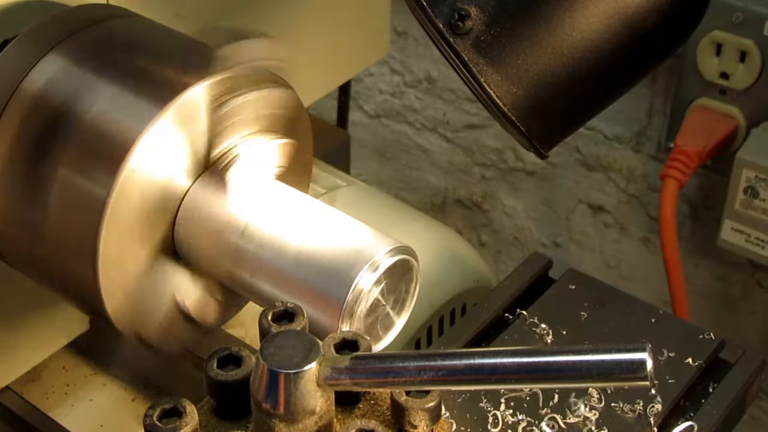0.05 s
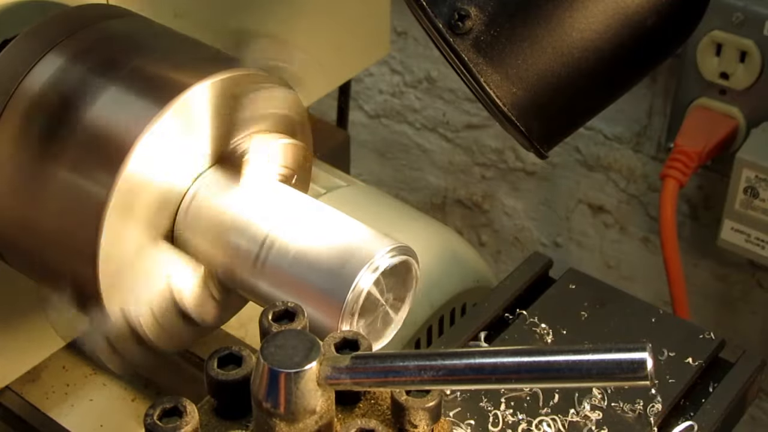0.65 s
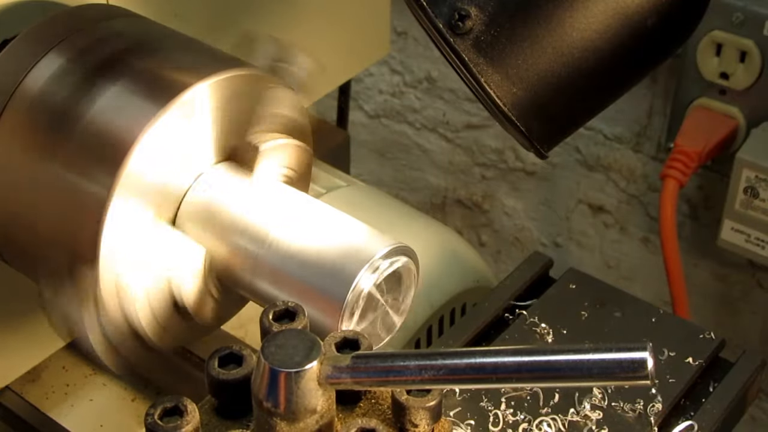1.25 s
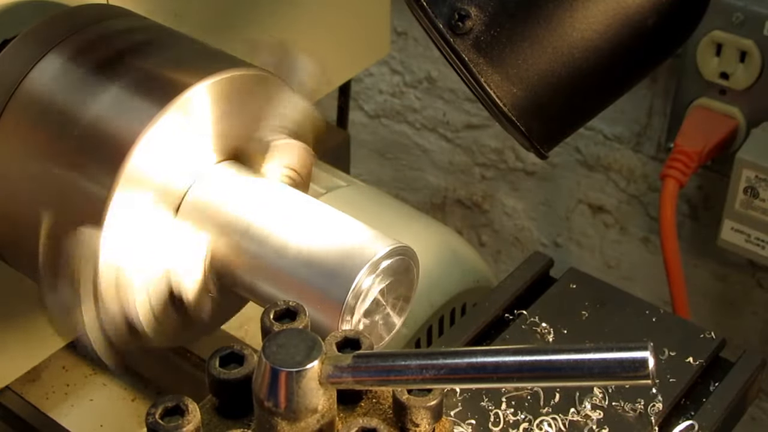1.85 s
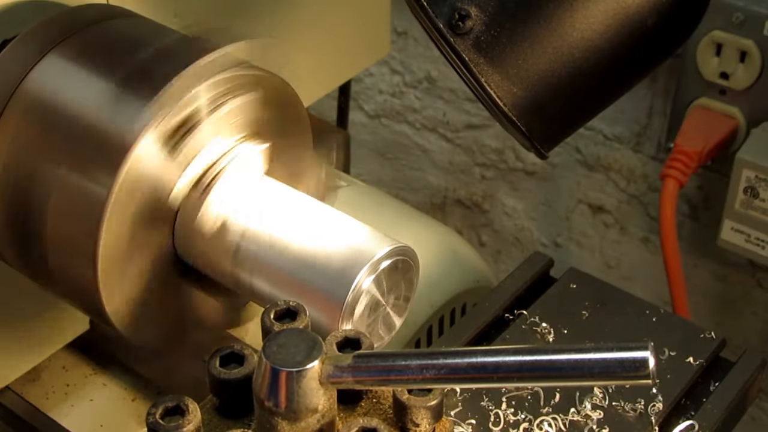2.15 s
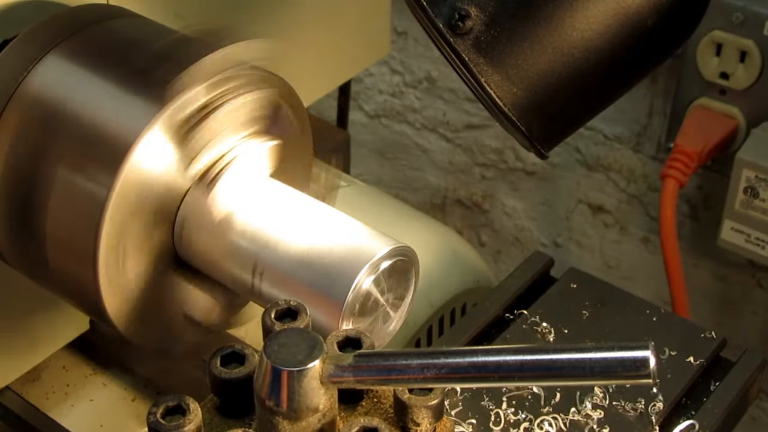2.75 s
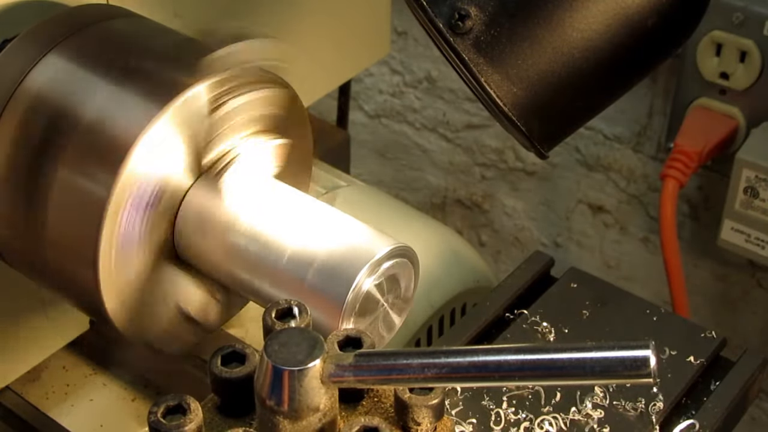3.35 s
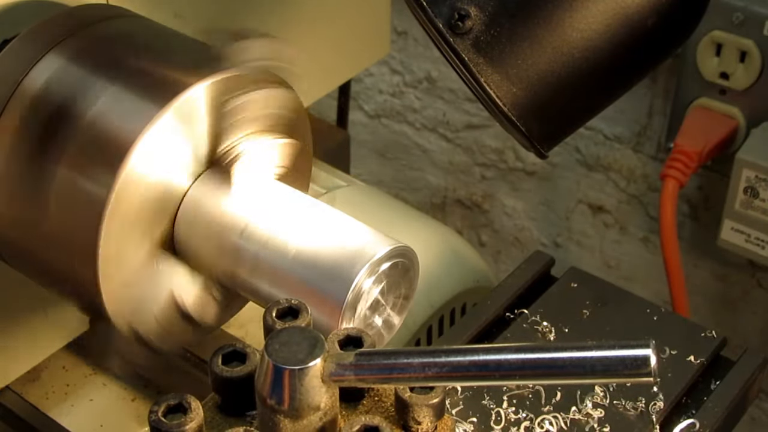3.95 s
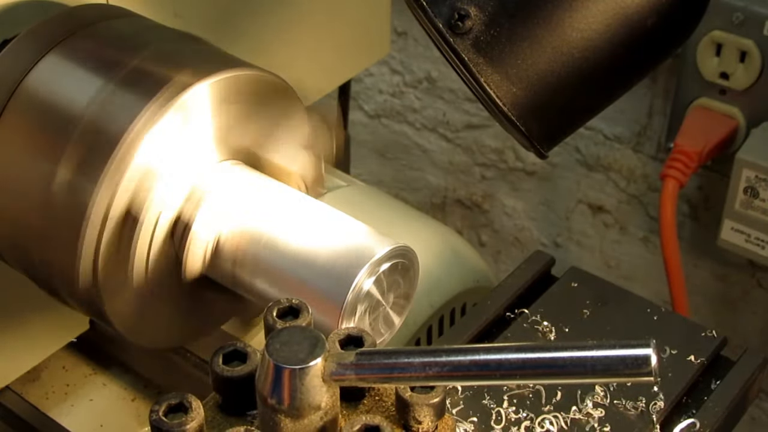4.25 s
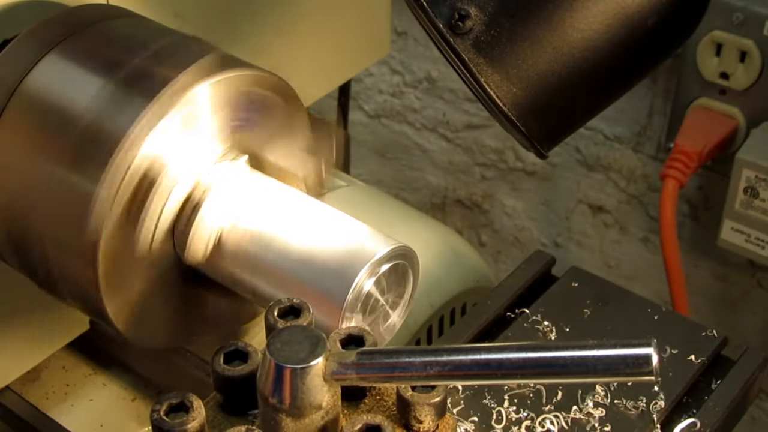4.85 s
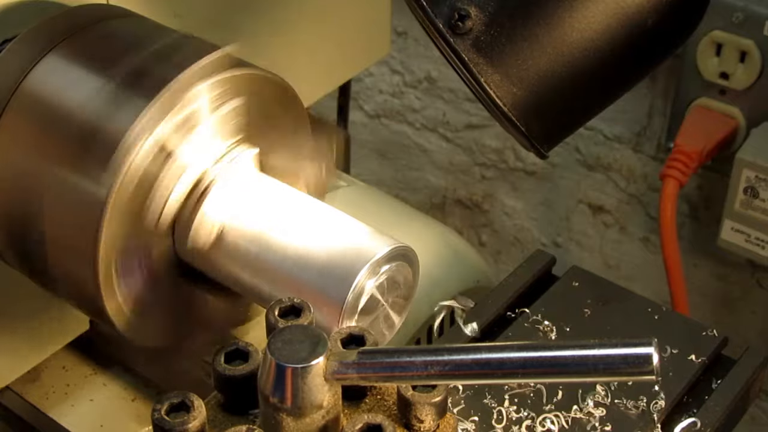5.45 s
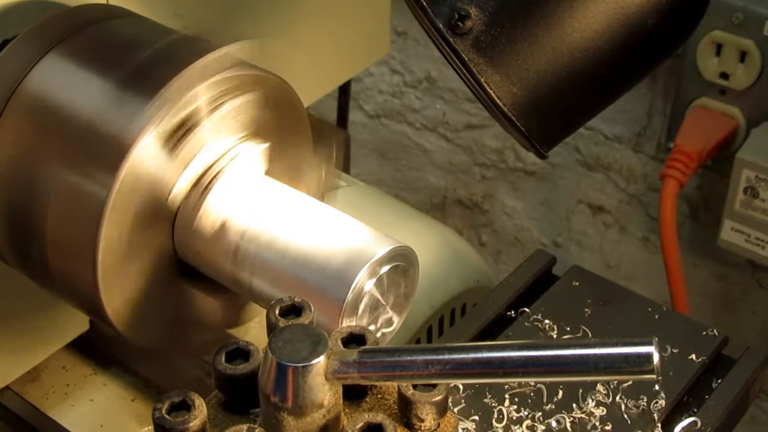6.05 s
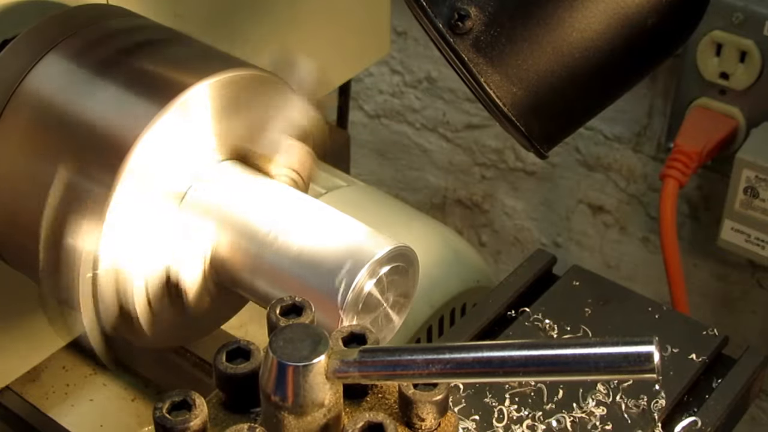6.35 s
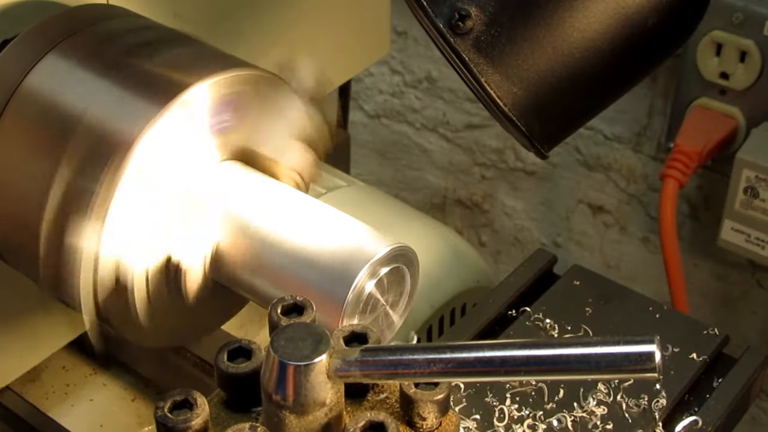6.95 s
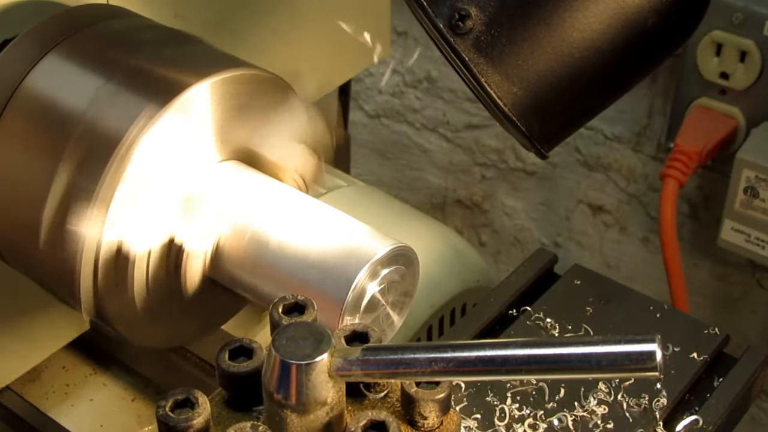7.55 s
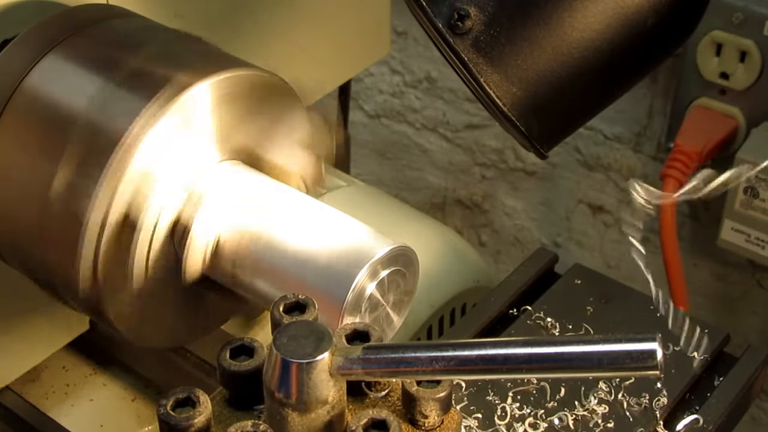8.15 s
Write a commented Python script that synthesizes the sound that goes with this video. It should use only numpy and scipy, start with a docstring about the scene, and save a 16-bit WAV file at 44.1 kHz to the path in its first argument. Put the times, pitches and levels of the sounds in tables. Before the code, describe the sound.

High-pitched ringing and brief squeals from a tool cutting metal on a small lathe, easing off as the motor's steady whirr swells.

```python
"""Small lathe cutting aluminium.

A mono microphone stands close to a small metal lathe in a workshop. The chip rubs over the tool, which
rings near 4.4 kHz, surges a few times a second and breaks into short squeals that stutter when the push
is hard, over the hum and whirr of the drive. Each loud squeal pushes the recorder's limiter down; as the
cut lightens, the limiter lets the machine swell up."""
import sys
import numpy as np
from scipy import signal
from scipy.fft import rfft, irfft
from scipy.io import wavfile
from scipy.ndimage import uniform_filter1d

SR = 44100
rng = np.random.default_rng(int(sys.argv[2]) if len(sys.argv) > 2 else 0)


def log_audio(samples):
    """Write samples as a 16-bit WAV file to the path given in sys.argv[1]."""
    # one column per channel
    frames = np.atleast_2d(samples).T
    # limit to full scale, then quantise
    limited = np.clip(frames, -1, 1)
    pcm = np.round(limited * 32767).astype(np.int16)
    wavfile.write(sys.argv[1], SR, pcm)


N = 361179
TIME = np.arange(N) / SR
FREQS = np.fft.rfftfreq(N, 1 / SR)
SPINDLE_HZ, BELT_HZ = 10.49, 6.7  # turns a second

# The tool's short squeals. Each row: start and length in seconds, level in dB, pitch in Hz, slip count.
SHORT_SQUEALS = [(0.007, 0.017, 4, 4170, 2), (0.053, 0.0072, 3, 4280, 1), (0.07, 0.029, 5.5, 4140, 3),
                 (0.137, 0.018, 4, 4377, 1), (0.237, 0.025, 1.5, 4310, 3), (0.545, 0.035, 4, 4206, 4),
                 (0.692, 0.006, 0.5, 4240, 1), (0.717, 0.029, 4, 4325, 3), (0.804, 0.021, -0.5, 4360, 1),
                 (1.093, 0.01, 1.5, 4377, 1), (1.154, 0.01, 2.5, 4176, 1), (1.182, 0.024, 4.5, 4410, 1),
                 (1.28, 0.02, -4, 4420, 1), (1.371, 0.016, -4.5, 4450, 1), (1.565, 0.012, 4.5, 4300, 1),
                 (1.582, 0.023, 3, 4200, 1), (1.788, 0.017, 0.8, 4420, 1), (1.952, 0.016, -2, 4430, 1),
                 (2.043, 0.03, 0, 4430, 1), (2.251, 0.042, -3.5, 4290, 4), (2.398, 0.017, 2, 4280, 2),
                 (2.424, 0.012, -0.5, 4405, 1), (2.464, 0.006, -3, 4070, 1), (2.471, 0.0195, 6, 4185, 1),
                 (2.518, 0.014, -3, 4414, 1), (2.824, 0.03, -1.5, 4280, 4), (2.88, 0.009, 1, 4387, 1),
                 (3.022, 0.057, 8, 4240, 4), (3.076, 0.063, 2.5, 4400, 4), (3.831, 0.013, 4, 4392, 1),
                 (4.134, 0.026, 0, 4390, 1), (4.363, 0.01798, 7, 4406, 1), (4.382, 0.019, 0, 4420, 1),
                 (4.711, 0.021, -3.5, 4490, 1), (4.804, 0.081, -5, 4410, 3), (4.994, 0.09, -4.5, 4410, 3),
                 (5.154, 0.021, -2.5, 4424, 1), (5.249, 0.021, 1.5, 4370, 1), (5.35, 0.013, 1.5, 4404, 1),
                 (5.412, 0.016, -1.4, 4450, 1), (5.446, 0.017, 0.95, 4410, 1),
                 (5.466, 0.027, -3.5, 4410, 1), (6.269, 0.01, -6.5, 4360, 1), (6.419, 0.021, -7.5, 4480, 1),
                 (6.553, 0.009, -0.5, 4402, 1)]


def amp(db):
    """Decibels to gain."""
    return 10 ** (np.asarray(db) / 20)


def unit(x):
    """Scales to rms 1."""
    return x / np.sqrt(np.mean(abs(x) ** 2) + 1e-20)


def curve(rows, column=1):
    """One column of a table, joined by straight lines in time."""
    rows = np.asarray(rows)
    return np.interp(TIME, rows[:, 0], rows[:, column])


def spectrum(points):
    """Levels in dB at every frequency, joined on a log axis."""
    hz, db = np.transpose(points)
    return np.interp(np.log(FREQS + 1), np.log(hz), db)


def colour(x, db):
    """Filters x by a dB spectrum; rms 1."""
    return unit(irfft(rfft(x) * amp(db), N))


def drift(rate_hz):
    """A smooth random curve of rms 1 that moves at up to rate_hz."""
    size = int(rate_hz * N / SR) + 2
    return unit(irfft(rfft(rng.standard_normal(N))[:size], N))


def phase_of(hz):
    """Running phase of a pitch curve."""
    return 2 * np.pi * np.cumsum(hz) / SR


def repeating(pattern, turn_hz):
    """Plays one turn's worth of a pattern over and over."""
    return pattern[(TIME % (1 / turn_hz) * SR).astype(int)]


def drive(whirr_db=-16.0, repeat_share=0.44, repeat_edge_hz=800, flicker_db=0.79, waver=0.3):
    """Bearing and belt noise shakes the lathe, partly the same on every turn, under the motor's tones."""
    # The whirr's spectrum. Each row: frequency in Hz, relative level in dB.
    whirr = [(25, -38), (55, -15), (100, -9), (135, 1), (195, -9.5), (280, -2), (430, 3), (740, -5),
             (1050, -2.5), (2700, -3.5), (4500, -4.5), (5600, -16.5), (8000, -20), (15000, -38.5)]
    # Resonances of the headstock and its covers, plus the tool's lower ring near 4.2 kHz, shaken by
    # the drive. Each row: centre and width in Hz, lift in dB.
    resonances = [(475.4, 28, -10), (598, 75, 3), (957, 23, 3), (1488, 54, 3.5), (1635, 22, 6.5),
                  (1760, 48, 4), (2005, 110, 7.5), (2168, 37, 8), (2304.7, 30, 6), (2370, 65, 3.5),
                  (2584, 64.5, 6.5), (2732, 130, 6), (3084, 27, 7), (3590, 54, -6), (4206, 83, 11)]
    # Motor, belt and gears. Each row: pitch in Hz, level in dB before the growl's lift, wander in Hz.
    tones = [(120.1, -31, 0.096), (240.3, -34.5, 0.15), (270.6, -31.5, 1.44), (327, -38, 3.2),
             (420.3, -36, 2.5), (536, -33, 0.96), (602, -40, 1.1), (678, -45.5, 0.93), (1066, -38, 3.04),
             (1372, -40.5, 1.85), (1467, -36, 4.05), (1489, -35, 4.1), (1516, -35.5, 1.9),
             (1875, -39, 1.93), (1954, -35.5, 3.76)]
    # The low growl comes and goes. Each row: time in seconds, lift in dB.
    growl_lift = [(0, -2.5), (1.5, -0.5), (2.3, -1), (3.2, -0.5), (4.8, -0.3), (5.7, 2.5), (6.3, 2),
                  (6.9, 1.2), (8.19, 2)]
    lift_db = sum(db * np.exp2(-(2 * (FREQS - hz) / width) ** 2) for hz, width, db in resonances)
    belt, spindle, loose = rng.standard_normal((3, N))
    turning = unit(repeating(belt, BELT_HZ) + 0.72 * repeating(spindle, SPINDLE_HZ))
    share = repeat_share / (1 + (FREQS / repeat_edge_hz) ** 2)  # slip blurs the repeats at high pitch
    rolling = irfft(rfft(turning) * np.sqrt(share) + rfft(loose) * np.sqrt(1 - share), N)
    sound = amp(whirr_db + flicker_db * drift(45)) * colour(rolling, spectrum(whirr) + lift_db)
    for hz, db, wander in tones:
        unsteady = 1 + waver * min(wander, 2) * drift(9)
        sound += amp(db) * unsteady * np.sqrt(2) * np.sin(phase_of(hz + wander * drift(9.75)))
    growl = irfft(rfft(sound) / (1 + ((FREQS - 440) / 190) ** 4), N)
    return sound + (amp(curve(growl_lift)) - 1) * growl


def cutting_level(surge_hz=4.67, surge_db=2, jaw_db=0.46, snag_db=4.0, rest_db=-3.0,
                  grab_s=0.014, release_s=0.035, full_squeal_db=5.0, ceiling_db=-6.0):
    """How hard the chip rubs, in dB: the tool bites and eases, and the chuck's jaws ripple the load."""
    # The slow course of the cut. Each row: time in seconds, rubbing level in dB.
    course = [(0.0, -7), (0.42, -9.5), (0.62, -12), (1.1, -10.5), (1.46, -17), (1.7, -10.5), (1.95, -15.5),
              (2.35, -12), (2.75, -15), (3.15, -10.5), (3.4, -15), (4.7, -16.5), (5.44, -13), (5.62, -21),
              (5.9, -17.5), (6.2, -19), (6.68, -14.5), (6.9, -23), (7.75, -26), (8.19, -19)]
    surge = np.cos(2 * np.pi * surge_hz * (TIME - 0.086))
    jaws = np.cos(2 * np.pi * 3 * SPINDLE_HZ * (TIME - 0.015))
    t = TIME[::100]
    start, length, db, _, _ = np.transpose(SHORT_SQUEALS)[:, :, None]
    strength = np.minimum(amp(db - full_squeal_db), 1)
    late = t - start - length / 2
    # The chip drags harder at each squeal; then it breaks and the tool rests.
    snag = strength / (1 + (late / np.where(late < 0, grab_s, release_s)) ** 2)
    rest = strength / (1 + ((t - start - length - 0.055) / 0.02) ** 2)
    drag_db = np.interp(TIME, t, snag_db * snag.max(0) + rest_db * rest.max(0))
    level_db = curve(course) + surge_db * surge + jaw_db * jaws + drag_db
    return level_db - 10 * np.log10(1 + amp(level_db - ceiling_db) ** 2)  # rubbing only gets so loud


def overtones(phase, size, second_db, third_db, growth=0.27):
    """The chip sticks and slips: overtones that grow faster than the swing of the tool."""
    partials = amp(second_db) * np.cos(2 * phase) + amp(third_db) * np.cos(3 * phase)
    return np.sqrt(2) * size ** (1 + growth) * partials


def ringing(cut_db, chatter, ring_db=1.2, turn_db=2.0, uneven_db=1.59, steadiness=0.1, sag_hz_per_db=2.5):
    """The rubbing chip stirs the tool's modes, unevenly around each turn; gives sound and swing."""
    # The tool's bending modes. Each row: pitch and width in Hz, relative dB, extra dB per dB of cut.
    modes = [(4020, 180, -18.5, 2.6), (4218, 68, -7.5, 2), (4472, 89, 2.5, 1.07), (4355, 330, -4.5, 0.5)]
    heavier_db = cut_db - cut_db.mean()
    motion = np.zeros(N, complex)
    for hz, width, db, growth in modes:
        mode = np.fft.ifft(rfft(rng.standard_normal(N)) / (1 + 2j * (FREQS - hz) / width) ** 2, N)
        evened = unit(mode / abs(mode) ** steadiness)  # friction evens out the swing
        motion += amp(db + growth * heavier_db) * evened
    motion /= np.sqrt(uniform_filter1d(abs(motion) ** 2, size=4000))
    runout = np.sqrt(2) * np.cos(2 * np.pi * (SPINDLE_HZ * TIME + rng.random()))
    load_db = turn_db * unit(.5 * runout + 2 * repeating(drift(70), SPINDLE_HZ)) + uneven_db * drift(50)
    motion *= np.exp(-1j * phase_of(sag_hz_per_db * (heavier_db + load_db)))  # pushing lowers the pitch
    level = amp(cut_db + ring_db + load_db)
    motion *= level / (1 + (chatter / level) ** 2)  # chatter takes the tool over
    rough_phase = np.angle(motion) + 0.63 * drift(500)
    edge = overtones(rough_phase, abs(motion), second_db=-29.5, third_db=-30.5, growth=0.71)
    return np.sqrt(2) * motion.real + edge, abs(motion)


def scrape(swing, scrape_db=-27.5, grain_db=4, growth=0.57):
    """Grainy hiss from the cutting edge that turns to a rasp when the tool swings hard."""
    # The chip scraping over the tool. Each row: frequency in Hz, relative level in dB.
    hiss = [(1500, -7), (3700, 9), (5200, 1.5), (6800, 1), (8500, -6), (9500, -10.5), (11500, 1),
            (12400, -13), (13100, -7), (13700, -22), (15000, -12)]
    grain = amp(scrape_db + grain_db * np.tanh(drift(500)))
    return grain * swing ** (1 + growth) * colour(rng.standard_normal(N), spectrum(hiss))


def squeal_slips(duty=0.66, ends_db=-3.5, ends_sharp_hz=80, jitter=0.079,
                 spread_db=0.5, spread_hz=25, spread_length_db=2.5):
    """Splits each squeal into slips, loudest and lowest in the middle; gives rows for bursts()."""
    rows = []
    for start, length, db, hz, count in SHORT_SQUEALS:
        scatter = rng.standard_normal((count, 4)) * (count > 1)  # a stutter is uneven
        for k, (late, loud, high, long) in enumerate(scatter):
            place = (k + .5 + jitter * late) / count
            outer = (2 * place - 1) ** 2
            rows.append((start + place * length,
                         db + ends_db * outer + spread_db * loud,
                         hz + ends_sharp_hz * outer + spread_hz * high,
                         duty * length / count * amp(spread_length_db * long)))
    return rows


def bursts(rows, sag=0.00816, slip_sag=0.04, slip_s=0.002, slip_lead=0.207, vary_db=3.0,
           ragged_db=1.78, ragged_hz=230, harsh_below_hz=4330, harsh_db_per_hz=0.008):
    """Each burst swells and sags in pitch; the chip lets go in a falling chirp. Gives sound and swing."""
    sound, swing = np.zeros((2, N))
    grip = amp(-ragged_db * np.tanh(drift(ragged_hz)))  # the chip's hold is unsteady
    scatter = np.clip(rng.standard_normal((len(rows), 4)), -2, 2)
    for (middle_s, db, hz, length_s), (early, strong, sharp, slow) in zip(rows, scatter):
        span = slice(max(int((middle_s - .04) * SR), 0), int((middle_s + .04) * SR))
        t = TIME[span] - middle_s
        place = 2 * t / length_s
        size = amp(db) * np.exp2(-abs(place) ** 2.8) * grip[span]
        phase = phase_of(hz * (1 - sag * np.tanh(place)))
        edge = overtones(phase, size, second_db=-33.5, third_db=-46)
        slip = (t + length_s * (slip_lead + 0.047 * early)) / (slip_s * amp(2 * slow))
        fall = slip_sag * np.clip(slip + 0.2 * slip * abs(slip), -1, 3)
        slip_phase = phase_of(hz * (.985 + 0.0104 * sharp - fall))
        bite = np.exp2(-slip ** 2 * np.where(slip < 0, 2.5, .8))  # grabs quickly, lets go more slowly
        harsh_db = harsh_db_per_hz * (harsh_below_hz - hz)  # a hard push lowers the pitch and rasps more
        slip_size = amp(db + harsh_db + vary_db * strong) * bite
        chirp = overtones(slip_phase, slip_size, second_db=-27, third_db=-26)
        sound[span] += np.sqrt(2) * size * np.cos(phase) + chirp + edge
        swing[span] += size
    return sound, swing


def lesser_slips(cut_db, count=60, above_db=2.5, pitch_hz=4375, spread_hz=45, sag_hz_per_db=11,
                 length_s=0.0046, shorten=0.31, crowding=1.7):
    """Small slips come thicker, flatter and shorter when the cut is heavy; gives rows for bursts()."""
    chance = np.cumsum(amp(cut_db) ** crowding)
    at = np.searchsorted(chance, chance[-1] * (np.arange(count) + rng.random(count)) / count)
    _, high, long = rng.standard_normal((count, 3)).T
    heavier_db = cut_db[at] - cut_db.mean()
    pitches = pitch_hz - sag_hz_per_db * heavier_db + spread_hz * high
    lengths = length_s * amp(2 * long - shorten * heavier_db)
    return np.transpose([TIME[at], cut_db[at] + above_db, pitches, lengths])


def long_squeal(jitter_hz=45, slip_jitter=0.37):
    """The tool swings on its own for a moment, its pitch bowing down and back; gives sound and swing."""
    # The chatter locks into one squeal. Each row: time in seconds, level in dB, pitch in Hz.
    contour = [(0.885, -13, 3985), (0.901, 10, 4380), (0.912, 7, 4138), (0.928, 10.5, 4010),
               (0.94, 9.5, 4000), (0.962, 9.5, 4110), (0.969, 6, 4160), (0.977, 8.5, 4280),
               (0.989, 10.5, 4370), (1.002, 7.9, 4320), (1.012, 4, 4290), (1.037, -2, 4330)]
    inside = (TIME > contour[0][0]) & (TIME < contour[-1][0])
    size = abs(uniform_filter1d(amp(curve(contour)) * inside, size=120))
    size *= amp(1 - 4.7 * abs(drift(105.6)))  # the chip keeps losing its grip
    phase = phase_of(curve(contour, 2) + jitter_hz * drift(428))
    rough_phase = phase + slip_jitter * drift(1200)
    edge = overtones(rough_phase, size * amp(1.6 * drift(190)), second_db=-28.5, third_db=-32.5)
    return np.sqrt(2) * size * np.cos(phase) + edge, size


def workshop(x, wet_db=-18, t60_s=0.54, first_s=0.017):
    """Adds a short tail of scattered reflections from bench and walls."""
    t = TIME[:SR // 3]
    taps = rng.standard_normal(len(t)) * (rng.random(len(t)) < .1)
    taps *= (t > first_s) * amp(-60 * t / t60_s)
    return x + amp(wet_db) * signal.fftconvolve(x, taps / np.linalg.norm(taps))[:N]


def scene():
    """Tool and drive at the close microphone, the same in both channels."""
    cut_db = cutting_level()
    short, short_swing = bursts(squeal_slips())
    long, long_swing = long_squeal()
    lesser, lesser_swing = bursts(lesser_slips(cut_db))
    squeal_swing = short_swing + long_swing
    between = 1 / (1 + (squeal_swing / amp(cut_db)) ** 2)  # lesser slips give way to the loud ones
    chatter = squeal_swing + between * lesser_swing
    ring, ring_swing = ringing(cut_db, chatter)
    tool = workshop(short + long + between * lesser + scrape(chatter + ring_swing)) + ring
    return np.tile(tool + drive(), (2, 1))


def record(dry, limit_db=-8.0, recovery_db_per_s=4.0, start_db=15.5, edge_hz=15100):
    """The recorder's limiter clamps at once and recovers slowly; a low-pass takes off the top treble."""
    power_db = 10 * np.log10(abs(uniform_filter1d(dry[0] ** 2, size=130)) + 1e-12)
    over_db = np.maximum(power_db - limit_db, 0)
    over_db[0] = start_db  # already held down by the cut in progress
    recovered_db = recovery_db_per_s * TIME
    held_db = np.maximum.accumulate(over_db + recovered_db) - recovered_db
    limited = dry * amp(-uniform_filter1d(held_db, size=60))
    lowpass = signal.firwin(601, edge_hz, window=("kaiser", 9), fs=SR)
    return signal.oaconvolve(limited, lowpass[None], "same", axes=1)


dry = scene()
out = record(dry)
log_audio(out)
```